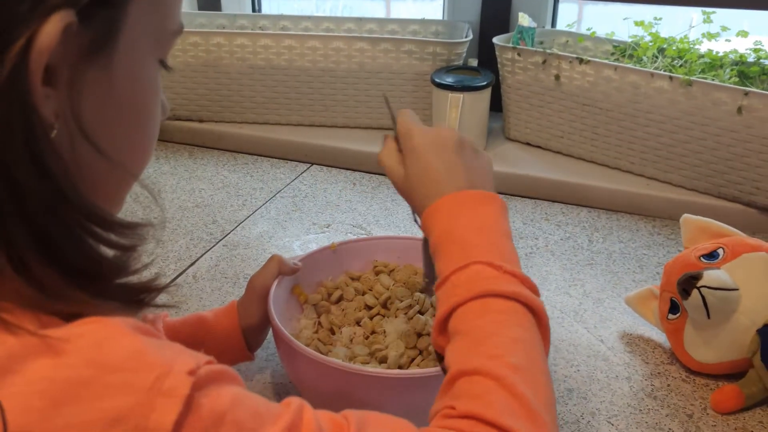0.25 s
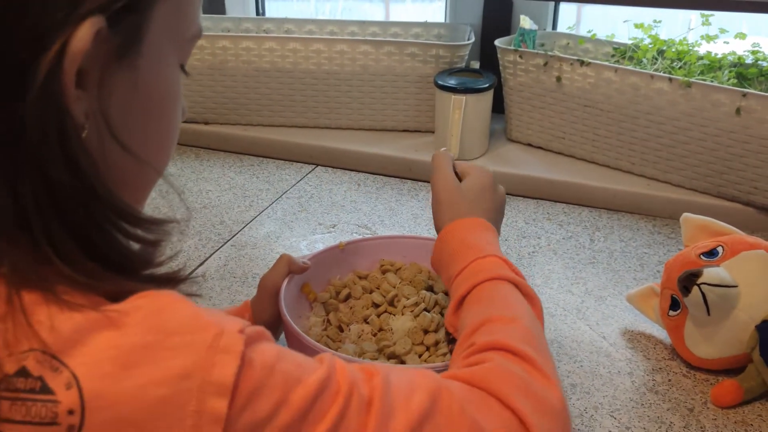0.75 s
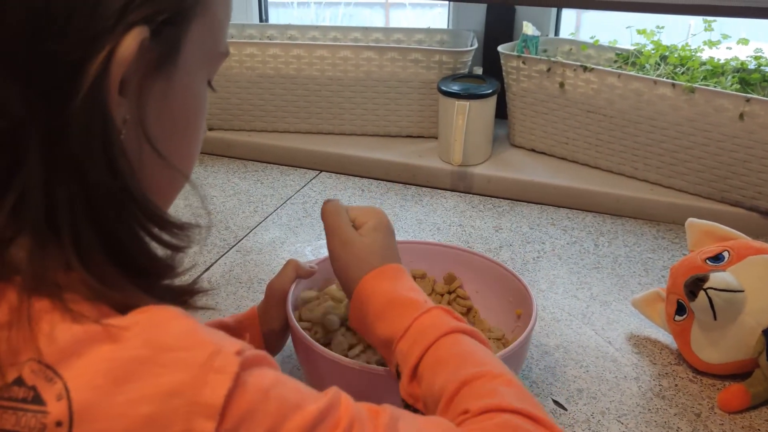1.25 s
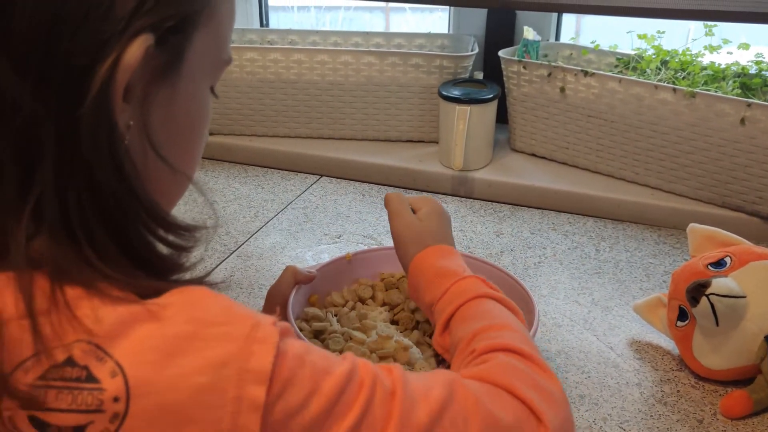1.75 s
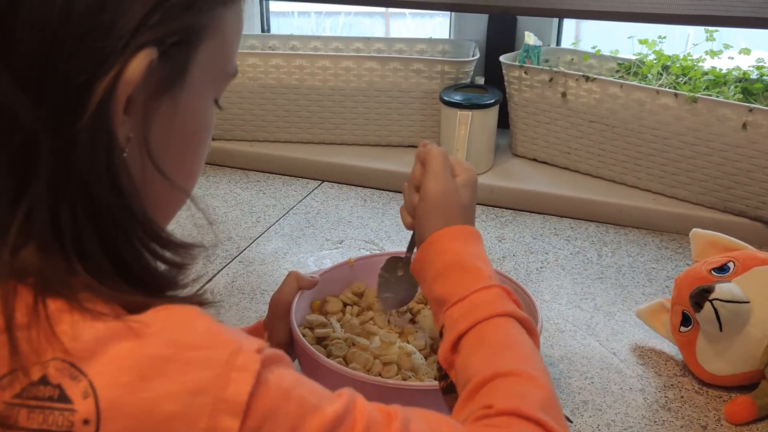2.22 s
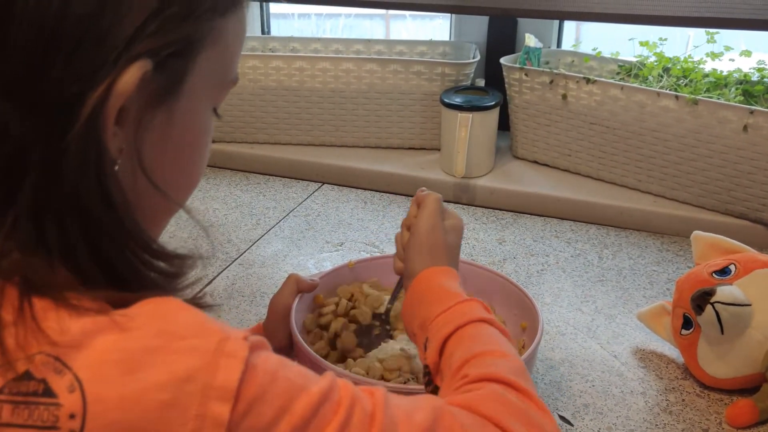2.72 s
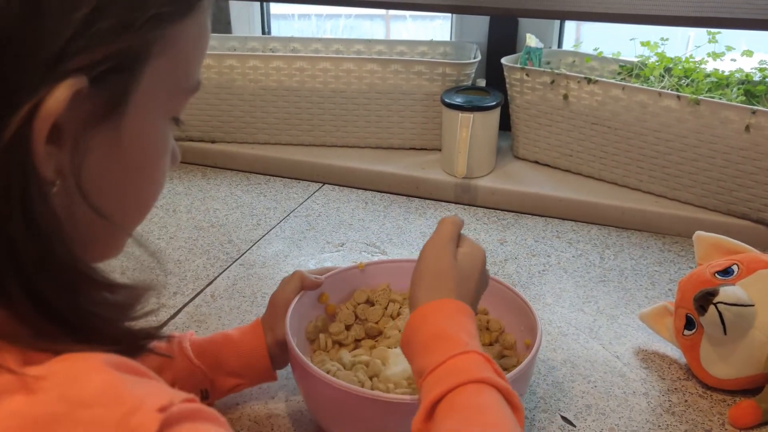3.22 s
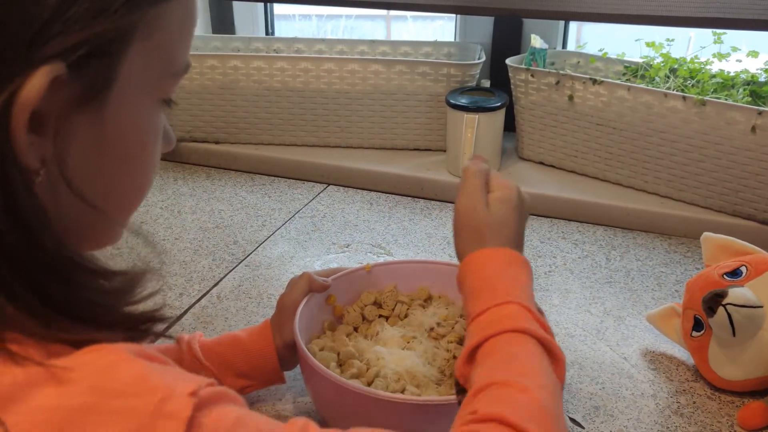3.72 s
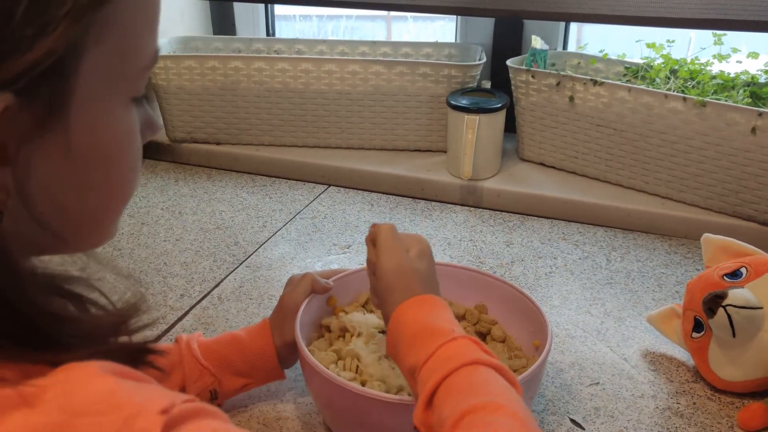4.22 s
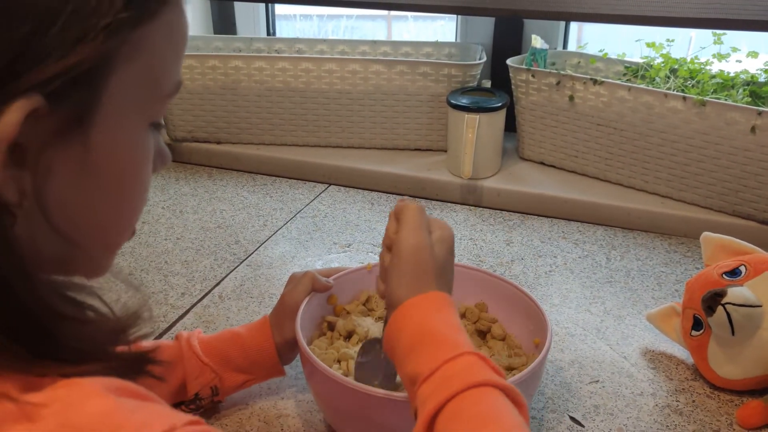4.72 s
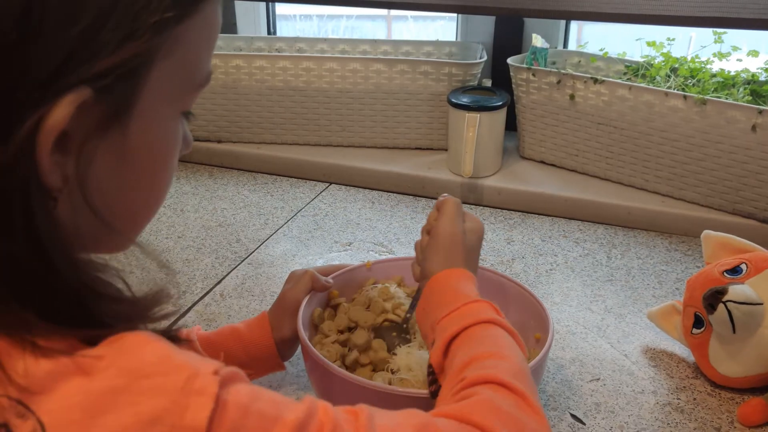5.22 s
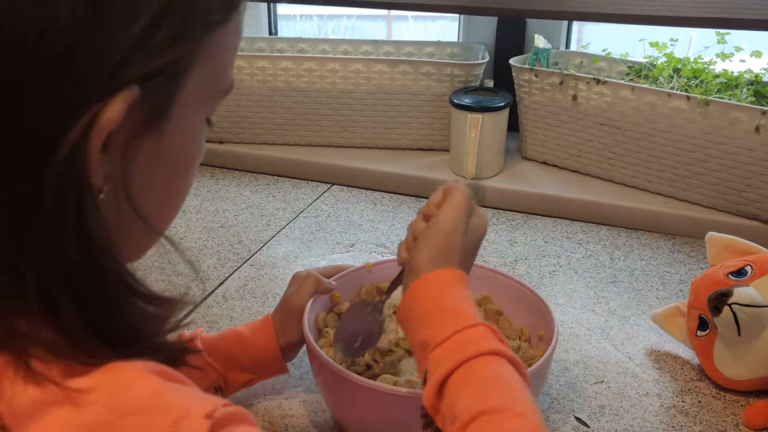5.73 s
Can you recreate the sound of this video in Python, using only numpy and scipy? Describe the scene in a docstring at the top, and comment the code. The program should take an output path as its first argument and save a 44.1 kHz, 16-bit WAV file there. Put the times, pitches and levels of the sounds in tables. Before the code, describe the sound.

A close stereo sound of dry, crunchy pieces stirred with a metal spoon in a plastic bowl, in a quiet kitchen with short diffuse echo. For the first half second there is mostly soft room noise and a low, steady appliance hum, with tiny ticks. Small clicks and a faint high ting come at 0.5 s, sharper ones at 0.7 s. From 0.8 to 1.9 s the stirring is thickest: brittle crackle, hollow plastic knocks and fine crumb hiss, with a tight cluster of clacks near 1.75 s. It drops around 2.0-2.4 s, a click at 2.44 s restarts it, and moderate rustling surges run to 3.7 s. After a brief lull, a sharp crack hits at 3.92 s. Weaker, sparser scrapes and knocks follow at 4.3, 4.9, 5.2 and 5.45 s. Barely audible low counter thuds lie underneath. At 5.95 s a hard double spoon rap, the loudest event, ends it.

```python
"""A metal spoon stirs dry, crunchy pieces in a plastic bowl: sparse ticks and faint spoon tings at first.
From 0.8 s pieces tumble thickly: random dying bursts ring the pieces, bowl wall, crumbs and bowl body.
Listed knocks stand out, thickest up to 1.9 s; surges then come and go, with a sharp crack at 3.9 s.
Decaying modes give a faint spoon rap at 1.7 s, two hard ones at 5.95 s, and low thuds of the counter.
Throughout, a noise-tail echo follows the bowl, over shaped room noise and the soft drone of an appliance."""
import sys
import numpy as np
from scipy import signal
from scipy.fft import rfft, irfft, next_fast_len
from scipy.io import wavfile
from scipy.ndimage import uniform_filter1d

SR = 44100
rng = np.random.default_rng(int(sys.argv[2]) if len(sys.argv) > 2 else 0)


def bounce(signal):
    """Save signal as a 16-bit WAV file at the path given by the first command-line argument."""
    frames = np.transpose(np.atleast_2d(signal))
    limited = np.clip(frames, -1, 1)
    pcm = np.round(limited * 32767).astype(np.int16)
    wavfile.write(sys.argv[1], SR, pcm)


def rack_gain(trim_db):
    """Turn a fader trim in dB into the linear factor to multiply a signal by."""
    fader = np.asarray(trim_db, float)
    return 10 ** (fader / 20)


N = 262904

# resonances of the pieces: centre_hz, width_hz, level_db
PIECE_BANDS = [(4056, 530, -8), (4520, 363, -2.5), (4810, 360, 0.5), (5325, 730, -6.5), (6230, 1030, -12.5),
               (7260, 1000, -17.5), (9000, 980, -21), (11000, 920, -40)]
# resonances of the bowl wall: centre_hz, width_hz, level_db
WALL_BANDS = [(1660, 570, -12), (2070, 300, -1.5), (2450, 356, 0.5), (2874, 420, -1), (3270, 262, -3),
              (3595, 350, -8.5)]
# resonances of the crumbs: centre_hz, width_hz, level_db
CRUMB_BANDS = [(12200, 1250, -8), (11750, 450, -8), (12800, 3000, -2.5), (13650, 440, -6.5),
               (13700, 2800, -2)]
# resonances of the bowl's body: centre_hz, width_hz, level_db
BODY_BANDS = [(693, 164, 6.5), (967, 600, -8), (1271, 276, 3)]
# drive of pieces, wall, crumbs, body: left_over_right_db
LEFT_OVER_RIGHT_DB = [-0.5, 1.5, -6.5, 0]


def bowl():
    """Ticks and knocks ring the pieces, the wall, the crumbs and the bowl's body."""
    snap = tumbling(per_s=900.0, spread_db=3.5, clump_db=1.5, t60_s=0.015, alike=0.25,
                    low_hz=3656, high_hz=6390, tonal=0.23)
    tock = tumbling(per_s=600.0, spread_db=2.5, clump_db=2.5, t60_s=0.025, alike=0.17,
                    low_hz=1747, high_hz=3640, tonal=0.23)
    fine = tumbling(per_s=5400.0, spread_db=3.0, clump_db=2.5, t60_s=0.006, alike=0.034,
                    low_hz=11060, high_hz=14900, tonal=0.15)
    blows = knocks(offset_db=7.0, wall_db=-6.0, crumb_db=-4.0, body_db=-22.0,
                   wall_t60_s=0.043, alike=0.31, tonal=1.15)
    ticks = [snap + 0.47 * tock + 0.56 * fine, 1.14 * snap + tock, 0.9 * snap + fine, tock]
    gains = stirring()
    out = 0
    for k, bands in enumerate([PIECE_BANDS, WALL_BANDS, CRUMB_BANDS, BODY_BANDS]):
        force = gains[k] * rms_one(ticks[k]) + blows[k]
        out = out + resonate(balanced(force, LEFT_OVER_RIGHT_DB[k]), bands)
    return out


# surges of tumbling pieces: crest_s, crackle_db, rise_s_per_20db, fall_s_per_20db, wall_re_crackle_db
SURGES = [(0.002, -74.5, .01, .05, -9), (0.172, -62, .008, .17, -14), (0.23, -64, .07, .09, -13),
          (0.36, -74, .045, .08, -9), (0.502, -65, .015, .05, -16), (0.516, -56.5, .02, .035, -22),
          (0.685, -51, .01, .08, -7), (0.711, -53, .03, .035, -21), (0.749, -56, .04, .06, -20),
          (0.793, -54, .01, .1, -13), (0.853, -38.5, .06, .05, -2.5), (0.909, -41, .05, .2, -3.5),
          (1.11, -46, .012, .08, -2.5), (1.06, -56, .2, .6, -2), (1.194, -46, .03, .03, -11),
          (1.29, -43.5, .008, .12, 2), (1.27, -52.5, .3, .05, -1), (1.366, -40, .05, .12, 1.5),
          (1.466, -51, .04, .2, 2), (1.556, -51, .08, .22, -11), (1.682, -47, .007, .03, 2),
          (1.725, -47, .008, .3, 3.5), (1.801, -40, .09, .1, -1), (1.873, -42.5, .1, .09, -8),
          (2.025, -58, .2, .15, -2), (2.193, -60, .15, .055, -4.5), (2.285, -66, .08, .07, -4.5),
          (2.365, -64.5, .025, .075, -12), (2.44, -47.5, .01, .15, -15), (2.468, -45, .015, .15, 1),
          (2.6, -51, .2, .4, -1), (2.676, -45, .1, .07, -4.5), (2.722, -50, .04, .1, 1),
          (2.886, -49.5, .4, .15, -6), (2.925, -46, .06, .2, -1), (3.089, -49, .056, .135, -2.5),
          (3.185, -48, .06, .11, -1), (3.241, -45.5, .05, .15, -1), (3.335, -60, .2, .06, 6),
          (3.415, -62, .016, .06, -5), (3.502, -49, .13, .07, -1), (3.6, -53, .3, .08, 1),
          (3.69, -59, .04, .05, -2), (3.75, -72, .2, .3, -6), (3.922, -35.5, .012, .077, -1),
          (4.03, -57.5, .15, .06, -3), (4.111, -62, .015, .2, -8), (4.241, -60.5, .4, .1, -1),
          (4.289, -50.5, .1, .083, 1), (4.431, -49.5, .12, .09, 2.5), (4.577, -68, .2, .1, -1),
          (4.667, -68.5, .015, .07, -8), (4.856, -52.5, .008, .16, 1.5), (4.944, -56, .12, .045, -5),
          (5.102, -60, .13, .15, -4), (5.168, -48, .05, .22, -3.5), (5.36, -67, .1, .15, 5),
          (5.46, -51, .065, .17, 1.5), (5.56, -60, .15, .03, -1), (5.606, -57, .025, .02, -16),
          (5.68, -70.5, .14, .047, -6), (5.932, -55, .006, .03, 1), (5.954, -29.5, .003, .035, 1)]
# crumb hiss and bowl body re crackle: time_s, hiss_db, body_db
SHARES = [(0, -7, -25), (.2, -5, -29), (.36, -3, -22), (.5, -10, -30), (.52, 3, -34), (.6, -12, -25),
          (.75, -18, -25), (.9, -9, -21), (1.12, -10, -20), (1.3, -8, -17), (1.38, -11, -18),
          (1.48, -4, -21), (1.62, -10, -24), (1.8, -13, -24), (2.1, -14, -18), (2.29, 0, -24),
          (2.42, -10, -27), (2.68, -10, -15), (2.92, -11, -23), (3.04, -7, -26), (3.14, -14, -18),
          (3.24, -16, -14), (3.33, -19, -8), (3.5, -17, -20), (3.63, -9, -22), (3.7, -20, -22),
          (3.92, -17, -24), (4.0, -11, -19), (4.12, -18, -18), (4.24, -7, -15), (4.43, -11, -14),
          (4.5, -5, -19), (4.6, -13, -18), (4.9, -1, -13), (5.0, -13, -16), (5.14, -7, -15),
          (5.22, -13, -15), (5.42, -10, -9), (5.55, -16, -18), (5.7, -8, -25), (5.96, -7, -9)]
# heap between surges: crackle_db, wall_db
RESTING_DB = [-92, -85]
SETTLE_DB, SETTLE_FASTER = 15, 1.2   # beyond this far below its crest, a surge's slope gains this extra share


def stirring():
    """Gains of crackle, wall, crumbs and body: each surge swells to its crest and dies; powers add."""
    crest_s, crackle_db, rise_s, fall_s, wall_db = np.transpose(SURGES)[:, :, None]
    t = np.arange(0, N + 32, 32) / SR
    below_db = 20 * np.maximum((crest_s - t) / rise_s, (t - crest_s) / fall_s)
    surge_db = crackle_db - below_db - SETTLE_FASTER * np.maximum(below_db - SETTLE_DB, 0)
    crackle, wall = [np.sqrt(np.sum(rack_gain(2 * db), axis=0) + rack_gain(2 * rest_db))
                     for db, rest_db in zip((surge_db, surge_db + wall_db), RESTING_DB)]
    time_s, hiss_db, body_db = np.transpose(SHARES)
    crumbs = crackle * rack_gain(np.interp(t, time_s, hiss_db))
    body = crackle * rack_gain(np.interp(t, time_s, body_db))
    return [np.interp(np.arange(N) / SR, t, gain) for gain in (crackle, wall, crumbs, body)]


def tumbling(per_s, spread_db, clump_db, t60_s, alike, low_hz, high_hz, tonal):
    """Random ticks of uneven size, in clumps, from ten kinds of piece and spot; rms 1."""
    clumps = rms_one(uniform_filter1d(rng.standard_normal(N // 64 + 1), size=8))
    clumps = np.repeat(clumps, 64)[:N]
    born = rng.random(N) < per_s / SR
    sizes = rack_gain(spread_db * np.minimum(rng.exponential(1, N), 3.5) + clump_db * clumps)
    spot = rng.integers(0, 10, N)
    kinds = paths(t60_s, alike, np.geomspace(low_hz, high_hz, num=10), tonal, direct=2.43)
    out = 0
    for k, path in enumerate(kinds):
        ticks = born * sizes * (spot == k)
        out = out + signal.oaconvolve(ticks[None], path, axes=1)[:, :N]
    return rms_one(out)


# knocks that stand out: time_s, snap_db, wall_ring_db, wall_pitch_hz
KNOCKS = [(0.5022, -47, -62, 2010), (0.513, -43, -66, 2430), (0.6837, -45, -46, 2680),
          (0.6924, -32, -52, 3180), (0.752, -39, -55, 2010), (0.792, -37, -52, 2060),
          (0.817, -33, -40, 2100), (0.846, -36, -29.5, 2320), (0.9013, -28.5, -27, 2260),
          (0.9304, -37, -34, 2270), (1.0124, -44, -40, 2330), (1.051, -37, -42, 2350),
          (1.1109, -22, -37, 2060), (1.1334, -38, -38, 2650), (1.1917, -31.5, -34, 2250),
          (1.289, -37, -21.5, 2470), (1.3583, -27, -36, 2400), (1.3683, -32, -25, 2100),
          (1.4122, -26, -25, 2840), (1.4653, -28.5, -30.5, 2720), (1.6017, -38, -49, 2550),
          (1.6806, -23, -32, 2650), (1.7235, -40, -45, 2380), (1.7494, -29, -36, 2070),
          (1.7574, -26, -23, 2140), (1.7624, -22, -26, 2060), (1.7664, -29, -25, 2070),
          (1.7884, -35, -32, 2030), (1.7953, -22, -24, 2130), (1.8716, -31, -46, 2400),
          (1.8804, -29, -42, 2670), (1.9749, -37, -44, 2360), (2.0215, -43.5, -36, 2490),
          (2.0931, -45, -47, 2780), (2.187, -39, -38, 2870), (2.2877, -51, -53, 2470),
          (2.368, -54, -70, 2010), (2.426, -42, -67, 2680), (2.4364, -37, -54, 2020),
          (2.4412, -27, -49, 2150), (2.4673, -44, -32, 2370), (2.5054, -37, -35, 2940),
          (2.593, -42, -36, 2780), (2.6524, -39, -45, 2270), (2.8287, -42, -41, 2720),
          (2.9246, -32, -28, 2650), (2.9494, -39, -42, 2510), (2.9951, -38, -53, 2580),
          (3.0914, -36, -35, 2480), (3.1407, -41.5, -38, 2720), (3.1807, -27.5, -52, 2450),
          (3.2445, -31, -37, 2160), (3.321, -39, -48, 2600), (3.3613, -42.5, -38, 2900),
          (3.4558, -48.5, -34, 2430), (3.4755, -55, -35, 2180), (3.5034, -35, -31, 2500),
          (3.5224, -48, -36, 2190), (3.689, -42, -48, 2470), (3.907, -38, -45, 1940),
          (3.9152, -31, -38, 2570), (3.9235, -19.5, -33, 2530), (3.9364, -28, -31, 2020),
          (3.9494, -35, -38, 2300), (4.1096, -48, -58, 1930), (4.1168, -40.5, -49, 2270),
          (4.139, -37, -54, 2610), (4.2428, -44, -41, 2020), (4.2842, -42, -38, 2070),
          (4.3834, -43, -35, 2050), (4.4072, -35, -31, 1960), (4.555, -48, -41, 2690),
          (4.5895, -47, -52, 2530), (4.6927, -57, -63, 2290), (4.8544, -45.5, -36, 2000),
          (4.8724, -39, -40, 3240), (5.1454, -39, -37.5, 2460), (5.1677, -39, -30, 2280),
          (5.2227, -51, -32.5, 2035), (5.4, -55, -49, 2660), (5.6077, -39, -62, 2020),
          (5.676, -44, -65, 2680), (5.9309, -52, -40, 2900), (5.9354, -45, -37, 2880)]
SNAP_T60_S = 0.006


def knocks(offset_db, wall_db, crumb_db, body_db, wall_t60_s, alike, tonal):
    """Short burst per knock on pieces, wall, crumbs and body; the wall's burst carries the knock's pitch."""
    time_s, snap_db, ring_db, pitch_hz = np.transpose(KNOCKS)
    snaps = paths(SNAP_T60_S, alike, pitch_hz, 0, direct=4.3)
    rings = paths(wall_t60_s, alike, pitch_hz, tonal, direct=4.6)
    hiss_db = np.interp(time_s, *np.transpose(SHARES)[:2])
    levels_db = np.array([snap_db, ring_db + wall_db, snap_db + hiss_db + crumb_db, ring_db + body_db])
    levels = rack_gain(offset_db + levels_db)
    force = np.zeros((4, 2, N + SR))
    for k, at in enumerate(np.round(time_s * SR).astype(int)):
        bursts = np.array([snaps[k], rings[k], snaps[k], snaps[k]])
        force[:, :, at:at + snaps.shape[2]] += levels[:, k, None, None] * bursts
    return force[:, :, :N]


def paths(t60_s, alike, pitch_hz, tonal, direct):
    """Ticks at two ports: noise dying over the bowl's inner echoes, a pitched ring and a direct click."""
    t = np.arange(int(.04 * SR)) / SR
    draws = rng.standard_normal((len(pitch_hz), 3, len(t)))
    alike = np.clip(alike, 0, 1)
    noise = np.sqrt(alike) * draws[:, :1] + np.sqrt(1 - alike) * draws[:, 1:]
    ring = tonal * np.sin(2 * np.pi * np.asarray(pitch_hz)[:, None, None] * t)
    burst = (noise + ring) * rack_gain(-60 * t / t60_s)
    click = direct * np.sign(draws[:, 0, 0])
    lag = rng.integers(0, 5, len(pitch_hz))
    burst[:, 1, 2] += click
    burst[np.arange(len(lag)), 0, lag + 1] += click   # left port: 1 sample earlier to 3 later
    return burst / np.sqrt(np.mean(np.sum(burst ** 2, axis=2)))


SHIFTING_DB = 2.5   # standard deviation of the swell's random points


def resonate(force, bands):
    """Parallel band-passes, alternating signs, each swelling as the heap moves; unswelled, white keeps its rms."""
    probe = np.zeros((2, 4096))   # unit impulse ahead of the force, for the scaling
    probe[:, 0] = 1
    both, out = np.hstack([probe, force + 1e-18]), 0
    for k, (hz, width_hz, level_db) in enumerate(bands):
        edges_hz = [hz - width_hz / 2, hz + width_hz / 2]
        band = signal.butter(2, edges_hz, "band", fs=SR, output="sos")
        steps = rng.standard_normal(int(12 * N / SR) + 2)   # about 12 per s
        swell = np.interp(np.linspace(0, len(steps) - 1, N), np.arange(len(steps)), steps)
        gain_db = level_db + np.r_[np.zeros(4096), SHIFTING_DB * swell]
        out = out + (-1) ** k * rack_gain(gain_db) * signal.sosfilt(band, both)
    return out[:, 4096:] / np.sqrt(np.sum(out[0, :4096] ** 2))


def rms_one(x):
    """Scale to rms 1."""
    return x / np.sqrt(np.mean(x ** 2) + 1e-20)


def balanced(x, left_over_right_db):
    """Split a level difference evenly between left and right."""
    return x * rack_gain(np.array([[.5], [-.5]]) * left_over_right_db)


# spoon edge on bowl: time_s, level_db
RAPS = [(1.6805, -34), (1.6818, -47), (5.9537, -14.5), (5.9552, -18), (5.9575, -30)]
# bowl modes: pitch_hz, level_db, t60_s
BOWL_MODES = [(688, -16, 0.02), (1110, -20, 0.029), (2100, -5.5, 0.01), (3080, -9, 0.016),
              (4930, -13.5, 0.019), (5927, -18, 0.0054), (7160, -32, 0.015), (9440, -33, 0.0071)]


def spoon_raps():
    """The spoon edge raps the bowl's modes; the raps carry no bass."""
    raps = struck(RAPS, BOWL_MODES, spread_db=2.5)
    raps = signal.sosfilt(signal.butter(2, 300.0, "high", fs=SR, output="sos"), raps)
    return balanced(raps, -3)


# spoon set ringing: time_s, level_db
TINGS = [(.5135, -52), (.225, -62), (3.575, -72), (4.873, -51), (5.608, -61), (5.675, -61.5)]
# spoon modes: pitch_hz, level_db, t60_s
SPOON_MODES = [(6950, -6, .07), (11900, -4, .06), (13550, 0, .06), (13800, -6, .04), (14900, -8, .04)]


def spoon_tings():
    """The spoon itself rings in high, briefly decaying modes."""
    return struck(TINGS, SPOON_MODES, spread_db=3.0)


# pushes on the counter top: time_s, level_db
THUDS = [(0.782, -82), (0.888, -83), (1.345, -73), (1.605, -69.5), (1.863, -74), (2.551, -64.5),
         (2.933, -72), (3.089, -69), (3.188, -71), (3.31, -78), (3.55, -75), (3.943, -79), (4.948, -70),
         (5.328, -76)]
# counter modes: pitch_hz, level_db, t60_s
COUNTER_MODES = [(55.3, -3, 0.38), (73.7, 4.5, 0.34)]


def counter_thuds():
    """Pushes shake the counter top in two low modes."""
    return struck(THUDS, COUNTER_MODES, spread_db=3.5)


def struck(blows, modes, spread_db):
    """Impulses ring two-pole modes, with a random strength per blow, mode and port."""
    time_s, blow_db = np.transpose(blows)
    at = np.round(time_s * SR).astype(int)
    chance, out = rng.standard_normal((len(at), len(modes), 2)), np.zeros((2, N))
    for k, (hz, level_db, t60_s) in enumerate(modes):
        clicks = np.full((2, N), 1e-18)
        clicks[:, at] = rack_gain(blow_db + level_db + spread_db * chance[:, k].T)
        r, w = rack_gain(-60 / (t60_s * SR)), 2 * np.pi * hz / SR
        out += (-1) ** k * signal.lfilter([0, np.sin(w)], [1, -2 * r * np.cos(w), r * r], clicks)
    return out


KITCHEN_T60_S, KITCHEN_DB = 0.2, -5.5


def kitchen(x):
    """Diffuse echo of hard walls: dying noise, another one at each port, after a 4 ms gap."""
    t = np.arange(int(.5 * SR)) / SR
    tail = rng.standard_normal((2, len(t))) * rack_gain(-60 * t / KITCHEN_T60_S) * (t > .004)
    tail = tail / np.sqrt(np.mean(np.sum(tail ** 2, axis=1)))
    return rack_gain(KITCHEN_DB) * signal.oaconvolve(x.mean(axis=0)[None], tail, axes=1)[:, :N]


# room and microphone noise spectrum: freq_hz, relative_density_db
ROOM = [(15, -49), (25, -2), (87, -15), (180, 4.5), (236, -7.5), (293, -4.5), (354, -7.5), (775, -11),
        (1040, -22), (4030, -29), (4740, -26), (7110, -28.5), (8140, -37.5), (14000, -33.5), (16000, -42)]
# stereo likeness: freq_hz, left_right_correlation
LIKENESS = [(30, 0.17), (70, .6), (150, 0.93), (300, 1), (600, 0.1), (2000, 0.033)]
# appliance tones: centre_hz, width_hz, level_db
DRONE = [(146, 35, -74), (169.3, 18, -79.5), (199.4, 9.4, -69.5), (465, 18, -86)]
ROOM_DB, HUM_HZ, HUM_DB = -67.5, 283.5, -70


def room_tone():
    """Shaped room and microphone noise, narrow noise bands of an appliance and its one wavering sine."""
    size = next_fast_len(N)
    hz = np.arange(size // 2 + 1) * SR / size
    mid, side = rfft(rng.standard_normal((2, size)), axis=1)
    alike = np.clip(on_log(LIKENESS, hz), 0, 1)
    pair = np.sqrt(1 + alike) * mid + np.sqrt(1 - alike) * side * [[1], [-1]]
    out = rack_gain(ROOM_DB) * rms_one(irfft(pair * rack_gain(on_log(ROOM, hz)), size)[:, :N])
    for centre_hz, width_hz, level_db in DRONE:
        tone = irfft(pair / (1 + (2 * (hz - centre_hz) / width_hz) ** 2), size)[:, :N]
        out += rack_gain(level_db) * rms_one(tone)
    waver = rms_one(uniform_filter1d(rng.standard_normal(N), size=4000))
    turns = np.cumsum(HUM_HZ + 1.02 * waver) / SR
    hum = np.sin(2 * np.pi * turns + np.array([[.4], [-.4]]))
    out += np.sqrt(2) * rack_gain(HUM_DB + 2.3 * waver) * hum
    return balanced(out, 1)


def on_log(points, hz):
    """Read (Hz, value) points on a log-frequency axis."""
    at_hz, value = np.transpose(points)
    return np.interp(np.log(hz + 1e-9), np.log(at_hz), value)


def scene():
    """The bowl and spoon close by, their echo, the counter and the room."""
    near = bowl() + spoon_raps() + spoon_tings()
    return near + kitchen(near) + counter_thuds() + room_tone()


def band_limit(x):
    """A steep low-pass at the top of the band."""
    return signal.sosfilt(signal.butter(12, 16670, fs=SR, output="sos"), x)


TOP_HZ = 15900


def record(dry):
    """The microphone drops the deepest bass; a steep low-pass cuts the top."""
    cut = signal.sosfilt(signal.butter(3, 38.0, "high", fs=SR, output="sos"), dry)
    cut = signal.sosfilt(signal.cheby2(14, 45, TOP_HZ, fs=SR, output="sos"), cut)
    return band_limit(cut)


dry = scene()
out = record(dry)
bounce(out)
```